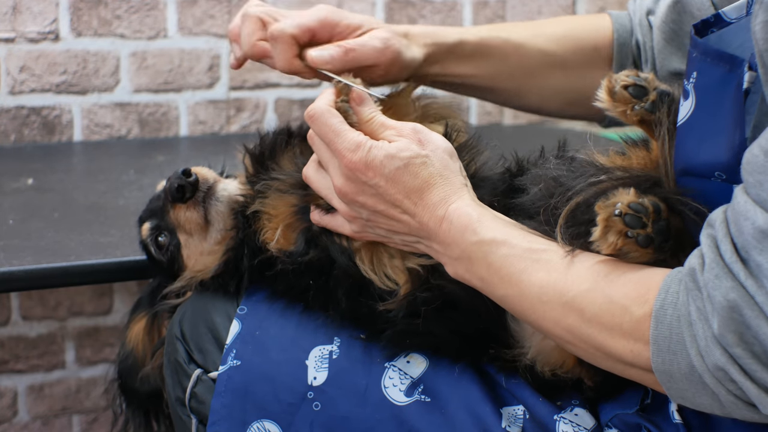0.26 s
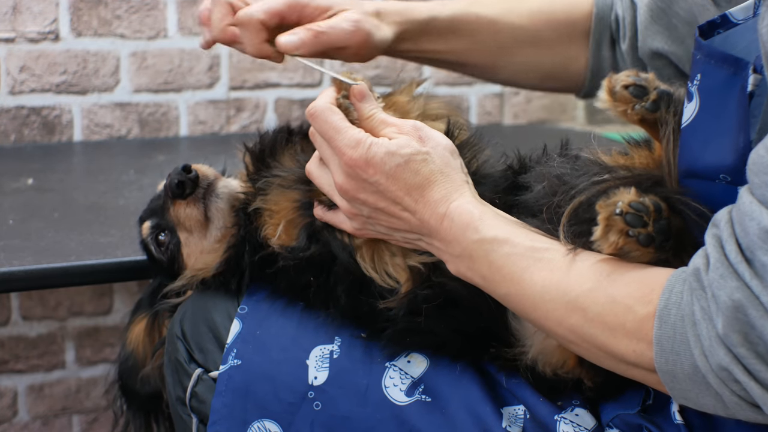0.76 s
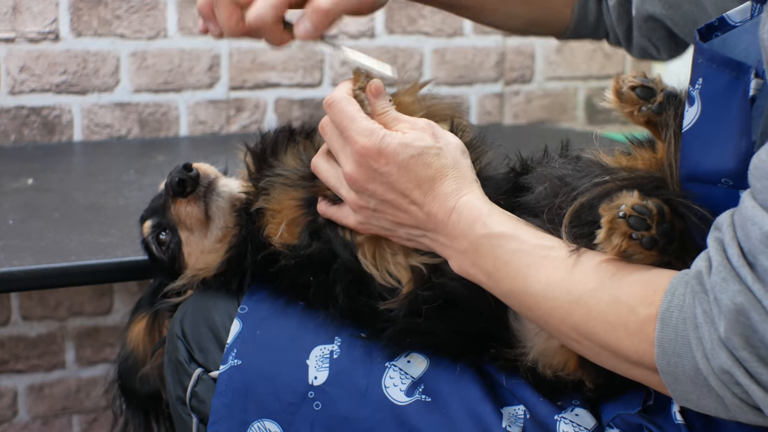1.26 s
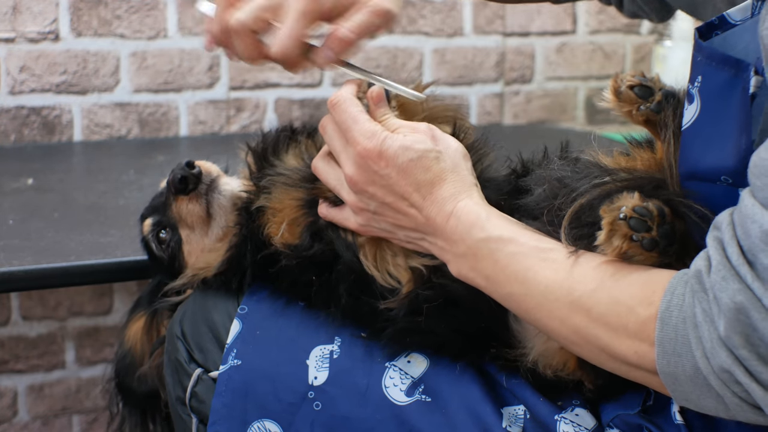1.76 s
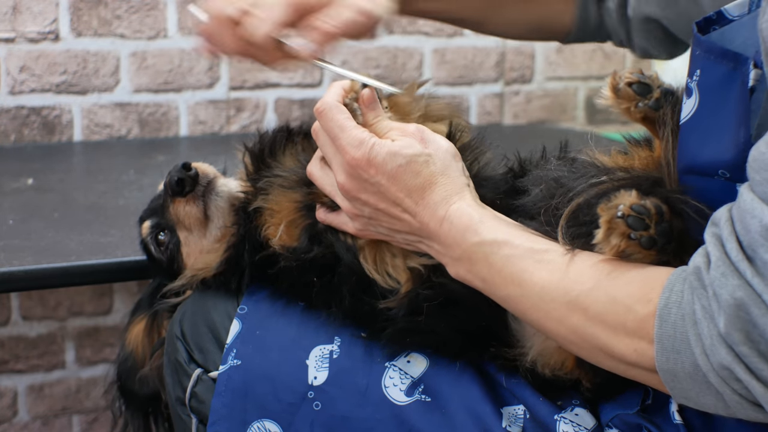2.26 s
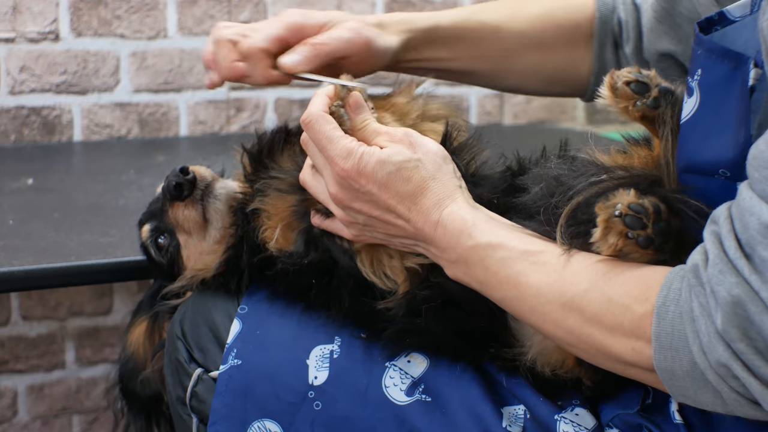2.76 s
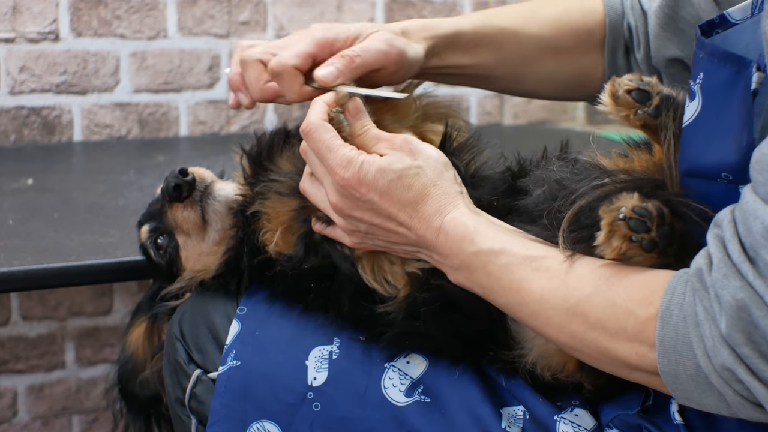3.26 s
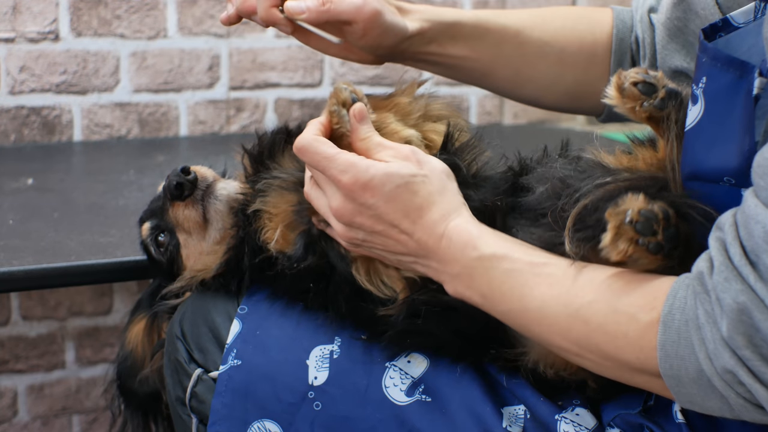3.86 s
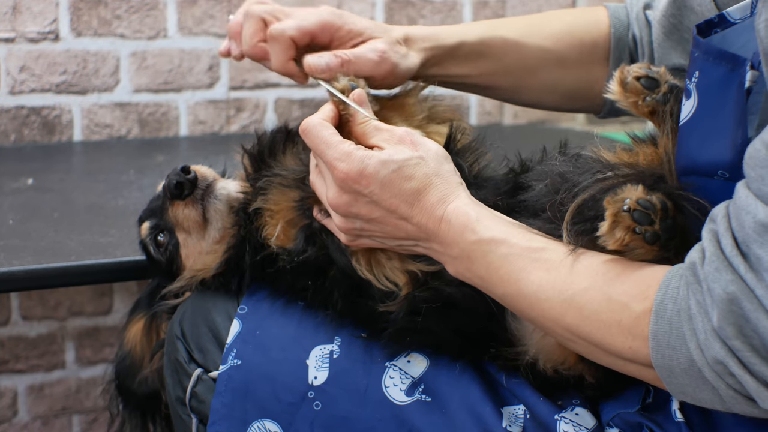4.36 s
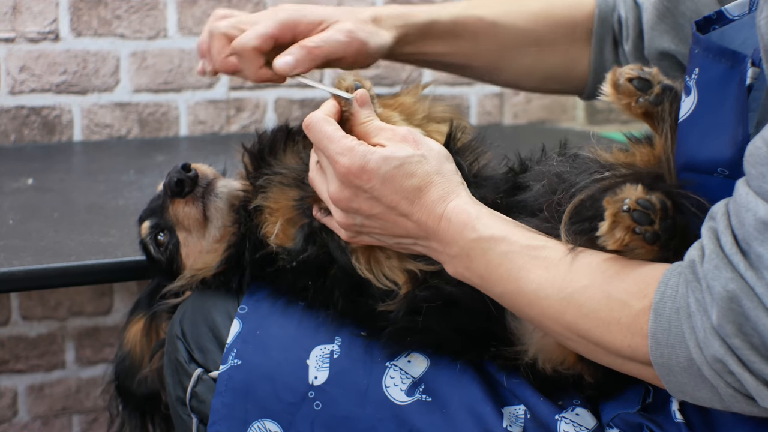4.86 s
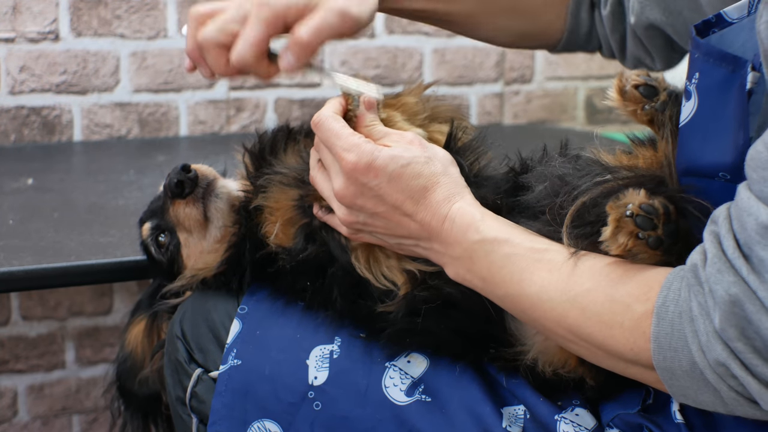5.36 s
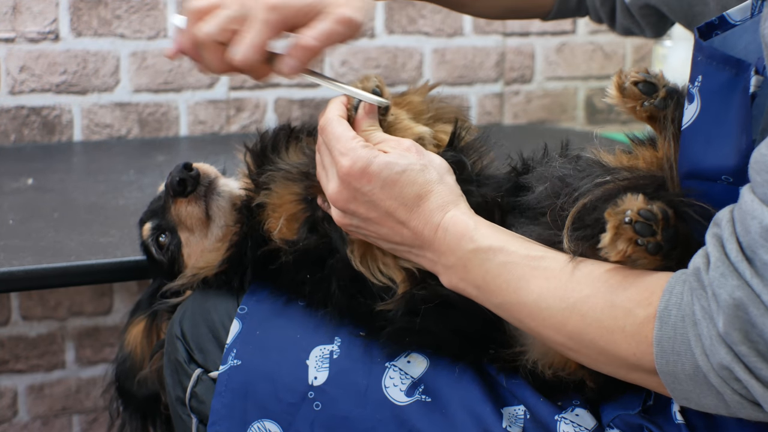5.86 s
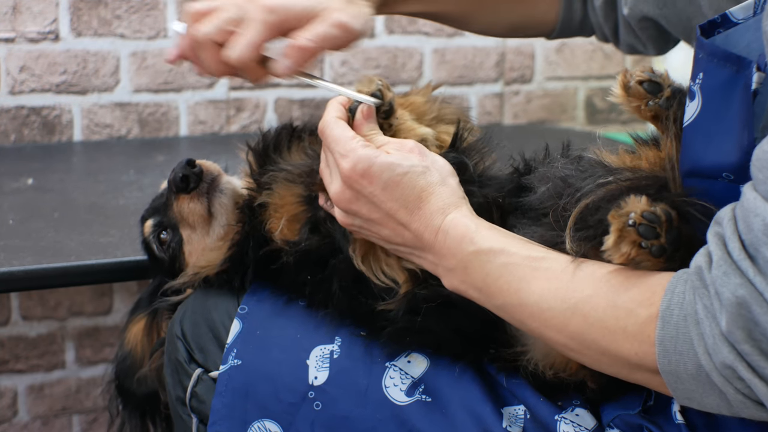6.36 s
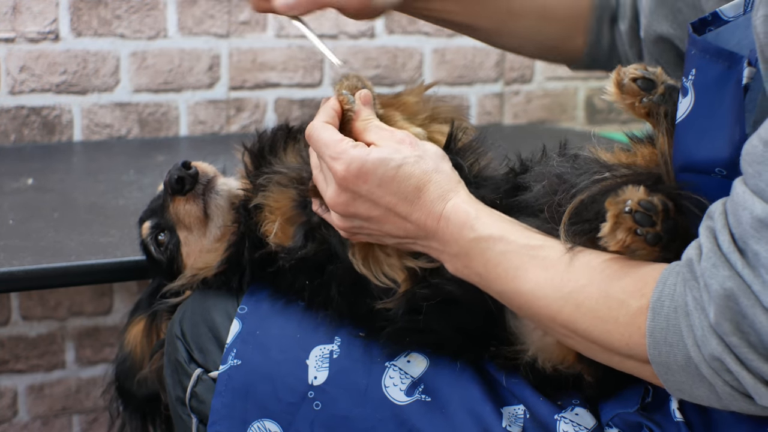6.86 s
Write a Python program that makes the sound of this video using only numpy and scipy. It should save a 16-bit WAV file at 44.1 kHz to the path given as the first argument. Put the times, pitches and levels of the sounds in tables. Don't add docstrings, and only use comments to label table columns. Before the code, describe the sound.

Dry, gritty back-and-forth scrapes of a metal file on animal claws, close up indoors, with tiny clicks and a soft final fur rustle.

```python
import sys
import numpy as np
from scipy import signal
from scipy.fft import rfft, irfft, next_fast_len
from scipy.io import wavfile
from scipy.ndimage import uniform_filter1d, map_coordinates

SR = 44100
rng = np.random.default_rng(int(sys.argv[2]) if len(sys.argv) > 2 else 0)


def master(y):
    cut = np.clip(np.atleast_2d(y).T, -1, 1)
    pcm = np.round(cut * 32767)
    wavfile.write(sys.argv[1], SR, pcm.astype(np.int16))


def level_to_linear(level):
    exponent = np.asarray(level, float) / 20
    return 10 ** exponent


N = 313110
SPAN = 8192


def unit(x):
    return x / np.sqrt(np.mean(np.abs(x) ** 2) + 1e-20)


def along(points, hz):
    f, v = np.transpose(points)
    return np.interp(np.log(hz + 1), np.log(f + 1), v)


def wobble(rate, size=N):
    knots = rng.standard_normal(int(size * rate / SR) + 4)
    return map_coordinates(knots, [np.arange(size) * rate / SR])


def causal(power):
    cepstrum = irfft(np.log(power + 1e-9) / 2, SPAN)
    cepstrum[1:SPAN // 2] *= 2
    cepstrum[SPAN // 2 + 1:] = 0
    return np.exp(rfft(cepstrum))


def rush(spectrum, alike):
    m = next_fast_len(N)
    hz = np.fft.rfftfreq(m, 1 / SR)
    turn = np.arccos(np.clip(along(alike, hz), -1, 1)) / 2
    noise = rfft(rng.standard_normal((2, m))) * level_to_linear(along(spectrum, hz))
    mid, side = irfft(noise * [np.cos(turn), np.sin(turn)], m)[:, :N]
    return unit(np.array([mid + side, mid - side]))


def body(modes, scatter_db):
    f = np.fft.rfftfreq(SPAN, 1 / SR)
    power = 0
    for c, w, db in modes:
        strength = level_to_linear(db + scatter_db * rng.normal()) ** 2
        peak = (f * w) ** 2 / ((c * c - f * f) ** 2 + (f * w) ** 2)
        skirt = (c / (c + abs(f - c))) ** 2
        power = power + strength * peak * skirt
    return power / power.mean()


# pitch in Hz, width in Hz, level in dB.
CLAW_MODES = [(900, 850, -9), (1380, 340, -2), (1735, 300, -4.5), (2180, 420, -3), (2600, 260, -3),
              (2920, 79, -1.5), (3320, 570, -8), (3755, 460, -4), (4020, 2300, -20.5), (5240, 1820, -8.5)]
# pitch in Hz, width in Hz, level in dB.
BLADE_MODES = [(5920, 390, -1), (6297, 240, 1.5)]
# pitch in Hz, width in Hz, level in dB.
PAW_MODES = [(282, 82, -1), (340, 250, 0.5), (444, 110, -7.5), (724, 120, -3.5)]
# pitch in Hz, width in Hz, level in dB.
GRIT_MODES = [(6900, 2600, -6), (8270, 510, -4), (9480, 880, 0.5), (10050, 2600, -8), (12500, 3500, -18.5)]
# frequency in Hz, left over right in dB.
STEREO_LEAN = [(60, -4), (200, -1.5), (380, -2), (700, 3), (2380, 2), (4400, -2), (8120, -0.5), (15000, 6)]
# frequency in Hz, common share (0 to 1).
PORTS_ALIKE = [(300, 0.84), (1400, 0.86), (3000, 0.25), (5000, 0.42), (6200, 0.49), (8000, 0.28),
               (15000, .1)]


def contact(push, paw_db, blade_db, grit_db, tone_hz, lift_db, grows_db=0, done=0):
    hz = np.fft.rfftfreq(SPAN, 1 / SR)
    common, *own = rfft(push * rng.standard_normal((3, SPAN)))
    lag_s = rng.normal(1.5e-5, 2.5e-5)
    lag = np.exp(2j * np.pi * hz * np.outer([1, -1], lag_s))
    share = np.clip(along(PORTS_ALIKE, hz), 0, 1)
    ports = np.sqrt(share) * common * lag + np.sqrt(1 - share) * np.array(own)
    ports = ports * level_to_linear(np.outer([.5, -.5], along(STEREO_LEAN, hz)))

    favoured = level_to_linear(lift_db * np.exp(-((hz - tone_hz) / 450) ** 2)) ** 2
    claw = body(CLAW_MODES, scatter_db=0.24) * favoured
    paw = level_to_linear(paw_db + 1.0) ** 2 * body(PAW_MODES, scatter_db=2.5)
    flesh = claw / claw.mean() + paw
    ring = body(BLADE_MODES, scatter_db=0.0) ** 2
    blade = level_to_linear(blade_db + 1.6) ** 2 * ring / ring.mean()
    grit = level_to_linear(grit_db + 0.37) ** 2 * body(GRIT_MODES, scatter_db=4.5)

    first, last = (irfft(ports * causal(flesh + grit + blade * level_to_linear(end * grows_db)), SPAN)
                   for end in (-1, 1))
    return first + (last - first) * done


# start in seconds, length in seconds, level in dB,
# bite time in ms, favoured claw tone in Hz.
PUSH_STROKES = [(.160, 0.096, -39.5, 52, 1380), (.395, .072, -39, 6.9, 3820),
                (.616, 0.062, -42.5, 1.5, 2200), (.814, 0.069, -41, 7.1, 2400),
                (1.020, 0.068, -39.5, 7.7, 1400), (1.527, 0.087, -42.5, 10, 1290),
                (1.758, 0.072, -36.5, 37, 3240), (1.974, 0.072, -41.5, 11, 3500),
                (2.189, 0.064, -39, 12, 3320), (2.397, .064, -47.5, 4, 1020),
                (2.629, 0.032, -44, 1.8, 3790), (2.995, 0.067, -40.5, 2.2, 2400),
                (3.200, 0.071, -41, 2.3, 2930), (3.403, 0.071, -40.5, 4, 2410),
                (4.354, 0.092, -46.5, 9.7, 2860), (4.570, .075, -39, 24, 2180),
                (4.781, 0.074, -38.5, 16, 1440), (4.989, .072, -39, .8, 2600),
                (5.209, 0.077, -41.5, 5, 3250), (5.714, 0.098, -42.5, 1.6, 2250),
                (5.991, 0.055, -42.5, 8, 1500), (6.185, 0.081, -40.5, 8.1, 3870),
                (6.408, .084, -35, 43, 2120)]
# start in seconds, length in seconds, level in dB, bite time in ms, claw tone in Hz.
PULL_STROKES = [(0.044, 0.086, -42, 17, 2200), (0.279, 0.084, -45, 6.7, 1460),
                (0.491, 0.087, -40.2, 33, 2240), (0.713, 0.081, -44.5, 4.1, 2240),
                (0.925, 0.061, -43, 0.7, 2500), (1.121, 0.093, -49, 9.4, 1030), (1.624, 0.1, -43, 35, 4050),
                (1.847, 0.1, -45.5, 12.6, 5400), (2.059, 0.11, -46.5, 7.9, 4800),
                (2.277, 0.084, -44, 9, 2100), (2.491, 0.08, -50, 28, 1030), (2.879, 0.084, -45, 21, 3530),
                (3.084, 0.086, -41, 46, 2740), (3.281, 0.095, -41.5, 39, 2570),
                (3.483, 0.089, -47.5, 49, 3790), (4.458, 0.083, -42, 27, 5200),
                (4.675, 0.081, -46, 2, 5170), (4.861, 0.1, -45.5, 25.0, 1030),
                (5.076, 0.1, -43.5, 43, 1720), (5.845, 0.096, -39.5, 47, 2150),
                (6.075, 0.077, -43.0, 4.0, 3450), (6.284, 0.091, -44, 9, 2570),
                (6.501, 0.095, -48, 24, 4910)]
# start in seconds, length in seconds, level in dB,
# bite time in ms, favoured claw tone in Hz.
GRAZE_STROKES = [
    (0, 0.021, -47.5, .5, 2050),
    (1.439, 0.029, -49.5, .5, 1190),
    (2.685, 0.035, -52, 8.8, 5040),
    (2.797, 0.027, -53, 1.5, 900),
    (4.125, .018, -50.5, 1, 2910),
    (5.512, .03, -54, 4, 4000),
]
# from when in seconds, paw thud in dB, blade ring in dB,
# grit hiss in dB, lift of the claw tone in dB.
CLAW_GRIPS = [
    (0, -10.5, -12.5, -14, 2.5),
    (.49, -20.5, -13, -14, 3.5),
    (1.3, -12.5, -11, -14.5, 3.5),
    (2.18, -14, -9, -8.5, 3),
    (2.86, -15, -9.5, -10.5, 2.5),
    (4.0, -11, -20, -10, 3.5),
    (4.76, -12.5, -18.5, -11, 0),
    (5.6, -14.5, -9.5, -11, 2.5),
]
# paw, blade and grit in dB over the grip, fade from start to end in dB,
# droop at both ends in dB, share of force landing at once, let-go in seconds, growth of the blade's ring
# from start to end in dB (it rings best with the claw near its tip).
PUSH_WAY = (0.23, -0.86, 0.28, -2.8, 2.8, .25, .008, -6)
PULL_WAY = (-2.5, 3.5, 3.5, -2.5, 5, 0.04, 0.03, 5)
GRAZE_WAY = (-0.5, -2, 0.5, -2.5, 3.5, -0.6, 0.1, .3)


def rasp():
    rasp_db = 0.32
    snags_per_s, snag_db = 120, 6.5
    out, t = np.zeros((2, N + SPAN)), np.arange(SPAN) / SR
    ways = [(PUSH_STROKES, PUSH_WAY), (PULL_STROKES, PULL_WAY), (GRAZE_STROKES, GRAZE_WAY)]
    moves = sorted((*row, way) for rows, way in ways for row in rows)
    for start, length, db, bite_ms, tone_hz, way in moves:
        *extra_db, fade_db, droop_db, land, let_go_s, grows_db = way
        grips = [row for row in CLAW_GRIPS if row[0] <= start or row is CLAW_GRIPS[0]]
        _, *grip_db, lift_db = grips[-1]

        bite = 1 - land * np.exp(-t * 700) - (1 - land) * np.exp(-t * 1000 / max(bite_ms, .2))
        let_go = (1 - np.tanh((t - length) / let_go_s)) / 2
        gate = bite * let_go
        done = np.minimum(t / length, 1.2)
        level_db = db + rasp_db + fade_db * (done - .5) - droop_db * (2 * done - 1) ** 2

        slow, medium, fine = (wobble(rate, size=SPAN) for rate in (71.5, 399.4, 2500))
        grains = level_to_linear(0.38 * slow + 0.98 * medium + 2.23 * fine)
        hits = 1. * (rng.random(SPAN) < snags_per_s / SR)
        snags = uniform_filter1d(hits, size=9) * 9
        grains = grains * level_to_linear(snag_db * snags)
        grains = grains / np.sqrt(np.average(grains ** 2, weights=gate ** 2))

        force = level_to_linear(level_db) * gate * grains
        out[:, round(start * SR):][:, :SPAN] += contact(
            force, *np.add(grip_db, extra_db), tone_hz, lift_db,
            grows_db=grows_db, done=np.minimum(done, 1))
    return out[:, :N]


def patchy(x, depth_db):
    z = signal.stft(x, nperseg=256)[2]
    field = rng.standard_normal(z.shape[1:])
    field = uniform_filter1d(uniform_filter1d(field, size=5, axis=0), size=6, axis=1)
    gain = level_to_linear(depth_db * unit(field))
    gain = gain / np.sqrt(np.mean(gain ** 2))
    return signal.istft(z * gain, nperseg=256)[1][:, :N]


# frequency in Hz, t60 in seconds.
ROOM_DECAY = [(300, 0.14), (2000, 0.16), (10000, 0.16)]


def room(x):
    hz, t, z = signal.stft(rng.standard_normal((2, SR // 3)), SR, nperseg=256)
    decay = level_to_linear(-60 * t / along(ROOM_DECAY, hz)[:, None])
    tail = signal.istft(z * decay, SR, nperseg=256)[1]
    return signal.fftconvolve(x, tail / np.linalg.norm(tail[0]), axes=1)[:, :N]


# frequency in Hz, level in dB per Hz.
RUMBLE_COLOUR = [(8.8, -29), (15, 3), (32, -4.5), (83, -2), (124, -8), (162, -15.5), (220, -22.5),
                 (290, -77), (480, -120)]
# frequency in Hz, left-right likeness (-1 to 1).
BACKGROUND_ALIKE = [(60, 0.89), (180, 0.32), (550, -0.037), (1650, 0.012), (4970, -0.14), (15000, 0.026)]
# pitch in Hz, level in dB rms.
MACHINE_TONES = [(41, -58.5), (61, -64), (81, -59), (92, -61.5), (122, -66.5), (2478, -78)]
# frequency in Hz, level in dB per Hz.
HISS_COLOUR = [(88, -9), (150, -7.5), (280, -7.5), (588, -10), (687, -12.5), (1100, -13.5), (2500, -17.5),
               (15900, -26)]


def background():
    rumble_db, hiss_db = -48, -54
    t = np.arange(N) / SR
    tones = 0
    for hz, db in MACHINE_TONES:
        level = level_to_linear(db + 4.5 + 3.2 * wobble(3.06))
        tones = tones + level * np.sin(2 * np.pi * hz * t + 0.88 * wobble(2.685))
    rumble = level_to_linear(rumble_db + 0.27 * wobble(2.82)) * rush(RUMBLE_COLOUR, BACKGROUND_ALIKE)
    hiss = level_to_linear(hiss_db + 0.55 * wobble(3.19)) * rush(HISS_COLOUR, BACKGROUND_ALIKE)
    return tones + rumble + hiss


# time in seconds, peak in
# dB, blade ring in dB, tap pitch in Hz, time to fall 85 dB in seconds.
EDGE_CATCHES = [(0.4, -31, -21, 1390, 0.02), (1.022, -37, -11, 1250, 0.024), (1.131, -43, -17, 2160, 0.03),
                (1.1522, -37, -24, 1520, 0.03), (1.44, -44, 5, 1500, 0.026), (1.4594, -44, 3, 1630, 0.028),
                (1.484, -43, -20, 1700, 0.02), (1.496, -49, -8, 2530, 0.03),
                (1.529, -35.5, -14, 3590, 0.018), (2.19, -39, -10, 1660, 0.03),
                (2.3457, -35, 4, 1660, 0.03), (2.5965, -51, 7, 1350, 0.025), (2.636, -41, -14, 3900, 0.03),
                (4.036, -48.5, -16, 1080, 0.03), (4.369, -40, -20, 1400, 0.052),
                (4.9902, -38, -9, 1490, 0.035), (5.213, -35.5, -9, 1810, 0.024),
                (6.551, -39, -15.5, 2100, 0.025), (6.8186, -39.5, -9, 3930, 0.045),
                (0.928, -36.5, -19, 1470, 0.026),
    (2.6338, -39, -14, 3860, 0.025),
    (3.406, -40, 2, 2300, 0.026),
    (4.5723, -37, -17, 2920, 0.027),
    (4.7875, -36, -10, 1220, 0.038),
    (5.9933, -40.5, -11, 2080, 0.03),
    (6.187, -38, -13, 2600, 0.034),
]


def catches():
    out, t = np.zeros((2, N + SPAN)), np.arange(SPAN) / SR
    for s, db, blade_db, hz, t60 in EDGE_CATCHES:
        attack = 1 - np.exp(-t / 0.00023)
        burst = level_to_linear(db - 0.5 - 85 * t / t60) * attack * (t < .1)
        grit_db = min(blade_db, -8) - 3
        out[:, round(s * SR):][:, :SPAN] += contact(burst, -10.5, blade_db, grit_db, hz, lift_db=11.0)
    return out[:, :N]


# time in seconds, peak in dB, pitch in Hz,
# decay t60 in seconds.
FLICKS = [(3.7779, -37, 1950, 0.0082), (5.3098, -34, 1950, .008), (2.3458, -33, 1700, .008),
          (2.3462, -27, 4200, .008), (2.1, -31, 2700, .008), (2.3459, -28, 6420, .022),
          (2.3461, -34, 5950, 0.022), (4.128, -49, 2900, .025), (4.131, -47, 1300, .03),
          (4.132, -49, 4050, .025), (4.141, -48, 2900, .02)]


def flicks():
    out, t = np.zeros(N + SPAN), np.arange(SPAN) / SR
    for s, db, hz, t60 in FLICKS:
        envelope = level_to_linear(db - 60 * t / t60) * (1 - np.exp(-t / 0.00035))
        out[round(s * SR):][:SPAN] += envelope * np.sin(2 * np.pi * hz * t)
    return out[:N] * level_to_linear([[.7], [-.7]])


# time in seconds, level in dB.
BRUSH_SWELLS = [
    (6.6, -63),
    (6.628, -71),
    (6.634, -61),
    (6.806, -65),
    (6.818, -55),
    (6.854, -56),
    (7.048, -48.5),
    (7.1, -52),
]
# frequency in Hz, level in dB per Hz.
FUR_COLOUR = [(300, -2.5), (900, -4.5), (2000, -2.5), (4000, -5.5), (7000, -10.5), (12000, -21),
              (16000, -28)]


def brush():
    s, db = np.transpose(BRUSH_SWELLS)
    level_db = np.interp(np.arange(N) / SR, s, db, left=-120)
    flutter_db = 0.97 * wobble(40) + 0.92 * wobble(500)
    return level_to_linear(level_db + flutter_db) * rush(FUR_COLOUR, [(300, 0.73), (3000, 0.085)])


def scene():
    near = patchy(rasp(), depth_db=2.0) + catches() + flicks()
    return near + level_to_linear(-10.5) * room(near) + brush() + background()


def low_pass(x):
    return signal.sosfilt(signal.butter(12, 16050, fs=SR, output="sos"), x)


def record(dry):
    top_hz = 15800
    kept = irfft(rfft(dry) * (np.fft.rfftfreq(N, 1 / SR) < top_hz), N)
    return low_pass(kept)


dry = scene()
out = record(dry)
master(out)
```